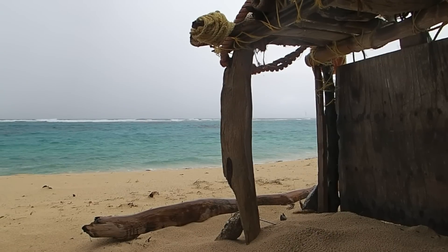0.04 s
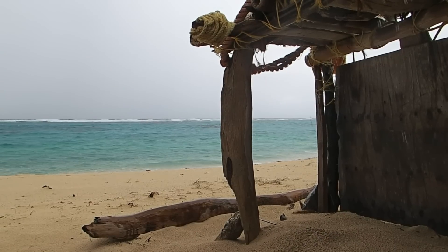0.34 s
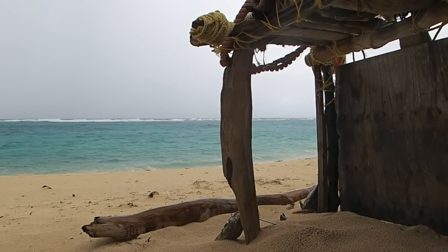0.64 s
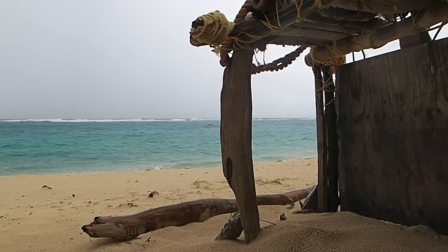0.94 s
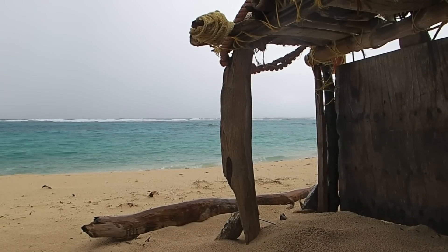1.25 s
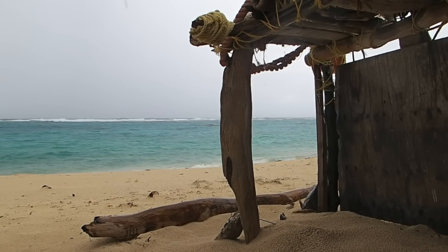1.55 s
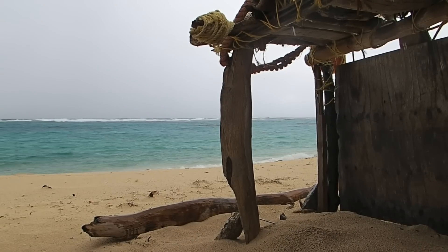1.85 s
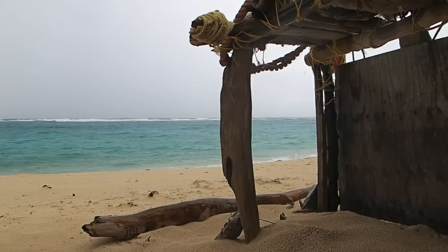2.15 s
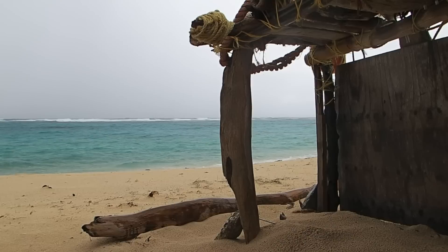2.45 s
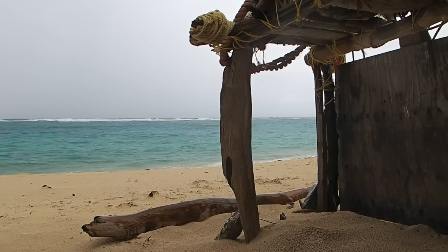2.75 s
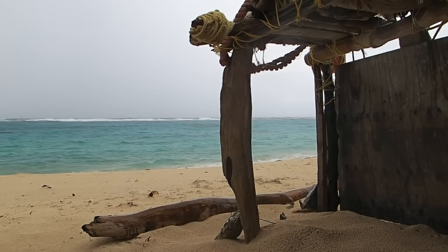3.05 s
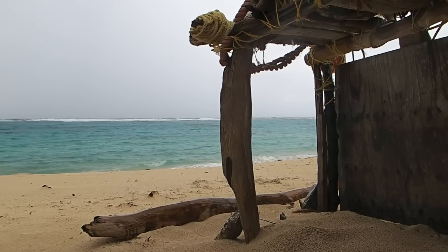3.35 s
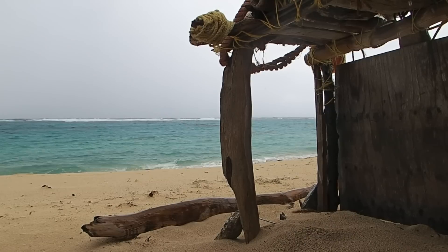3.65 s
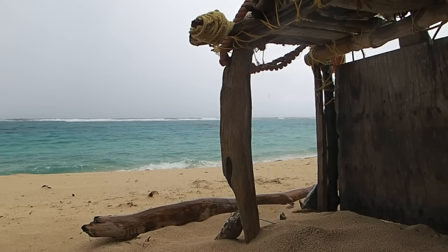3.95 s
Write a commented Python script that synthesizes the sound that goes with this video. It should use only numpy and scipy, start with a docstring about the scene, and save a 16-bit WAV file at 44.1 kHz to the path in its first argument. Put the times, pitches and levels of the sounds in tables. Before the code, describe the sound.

Rain falls evenly on a beach, heard from under a wooden shelter: a bright hiss, low patter on the roof and scattered close drips. Far waves wash behind it, and wind softly thumps the microphone midway.

```python
"""Rain on a beach, from under a shelter

Countless drops hiss on the sand and drum dully on the wooden roof; a few splash close by.
Surf washes on a far reef and light wind bumps the microphone. The microphone sits in a waterproof
case, whose resonance near 5 kHz gives the steady rain its thin sizzle."""
import sys
import numpy as np
from scipy import signal
from scipy.fft import rfft, irfft
from scipy.io import wavfile
from scipy.ndimage import uniform_filter1d

SR = 44100
rng = np.random.default_rng(int(sys.argv[2]) if len(sys.argv) > 2 else 0)


def generate_wav(sig):
    """Save sig (samples, or channels by samples) to the path in sys.argv[1] as 16-bit PCM at SR."""
    pcm = np.round(np.clip(np.atleast_2d(sig).T, -1, 1) * 32767).astype(np.int16)
    wavfile.write(sys.argv[1], SR, pcm)


N = 176400


def undb(db):
    """Decibels to amplitude ratio."""
    return 10 ** (np.asarray(db) / 20)


def unit(x):
    """Normalisation to rms 1."""
    return x / np.sqrt(np.mean(x ** 2))


def over_bins(table, size=N):
    """Interpolation of (Hz, value) rows over a spectrum, in log frequency."""
    hz, value = np.array(table, float).T
    return np.interp(np.log(np.fft.rfftfreq(size, 1 / SR) + 1e-9), np.log(hz), value)


def over_time(table):
    """Linear interpolation of (seconds, value) rows at every sample."""
    return np.interp(np.arange(N) / SR, *np.array(table, float).T)


def colour(x, table):
    """Minimum-phase filtering by (Hz, dB) rows: folding the cepstrum makes the response causal."""
    size = x.shape[-1]
    cepstrum = irfft(np.log(undb(over_bins(table, size))), size)
    cepstrum[1:size // 2] *= 2
    cepstrum[size // 2 + 1:] = 0
    return irfft(rfft(x) * np.exp(rfft(cepstrum)), size)


def wander(per_s):
    """Slow random modulation: smoothed steps with rms 1."""
    hold = max(int(SR / per_s), 2)
    steps = np.repeat(rng.standard_normal(N // hold + 1), hold)
    return unit(uniform_filter1d(uniform_filter1d(steps, hold), hold)[:N])


def noise():
    """Two uncorrelated white noises."""
    return rng.standard_normal((2, N))


def patter(per_s, spread_db):
    """Shot noise: impacts at random moments, many small and a few large, split over two signals."""
    falls = rng.random(N) < per_s / SR
    strength = undb(spread_db * np.minimum(rng.exponential(size=N), 5))
    angle = rng.uniform(0, 2 * np.pi, N)
    return unit(falls * strength * np.array([np.cos(angle), np.sin(angle)]))


def add(out, sound, start):
    """Superposition of a sound on the mix, at a start in seconds."""
    at = int(start * SR)
    out[:, at:at + sound.shape[1]] += sound[:, :N - at]


def surf():
    """Distant breakers sum incoherently to broadband noise that swells slowly and churns a little."""
    # Each row: frequency in Hz, relative spectral density in dB.
    spectrum = [(25, -62), (60, -18), (150, -8.5), (300, 1), (480, -5), (560, -0.5), (780, -1), (950, -4.5),
                (1180, -3), (1420, -7), (1630, -2.5), (1900, -7), (2200, -6.5), (2800, -10.5),
                (3700, -11.5), (6000, -23), (12000, -36.5)]
    # Each row: time in seconds, relative level in dB.
    swell = [(0, -42), (.4, -41.2), (1.2, -43.5), (1.8, -41), (2.3, -42), (3.35, -43), (3.7, -40),
             (4, -39.7)]
    wash = unit(colour(noise(), spectrum))
    return wash * undb(over_time(swell) + 1 + 0.37 * wander(per_s=9.1))


def wind():
    """Turbulent pressure at the microphone: an uneven rumble, partly coherent between the channels."""
    # Each row: centre in seconds, half length in seconds, level in dB.
    buffets = [(.02, 0.019, -51), (0.212, 0.032, -45.5), (0.306, 0.028, -46), (2.292, 0.058, -46)]
    # Each row: frequency in Hz, relative spectral density in dB.
    spectrum = [(20, -54), (35, -35), (50, -17), (70, -6.5), (95, -4.5), (125, 1.5), (170, -1), (260, -0.5),
                (600, -45), (2000, -89)]
    correlation, steady_db, gust_db = 0.49, -56, 1.5
    t = np.arange(N) / SR
    bumps = sum(undb(db) * np.exp(-((t - at) / length) ** 2) for at, length, db in buffets)
    air = np.sqrt(correlation) * rng.standard_normal(N) + np.sqrt(1 - correlation) * noise()
    push = undb(steady_db + gust_db * wander(per_s=7.88)) + bumps
    return colour(air * push, spectrum) / np.std(colour(air, spectrum))


def eddies():
    """An eddy passing one side of the microphone makes a pressure pulse: one soft push and pull."""
    # Each row: centre in seconds, pitch in Hz, level in dB, pan from -1 (left) to 1 (right).
    thumps = [(1.9933, 165, -24, .95), (2.2978, 195, -19.5, -1), (2.4734, 330, -25.5, 1)]
    half_length_cycles = .75
    t, out = np.arange(N) / SR, 0
    for at, hz, db, pan in thumps:
        cycles = (t - at) * hz
        thump = -np.sin(2 * np.pi * cycles) * np.exp(-(cycles / half_length_cycles) ** 2)
        out = out + undb(db) * thump * np.array([[1 - pan], [1 + pan]]) / 2
    return out


def roof():
    """Random impacts excite the low modes of the wooden roof and keep it drumming."""
    # Each row: frequency in Hz, bandwidth in Hz, relative level in dB.
    modes = [(163.5, 41, -0.5), (251, 41, -2), (309.7, 13.5, 0), (372, 72, 1.5), (549, 20, -11.5),
             (815, 21, -19)]
    # Each row: time in seconds, level in dB.
    level = [(0, -43.3), (.35, -42.5), (1.2, -43), (2.2, -42.5), (2.36, -40), (2.85, -43), (3.2, -41),
             (3.65, -43.7), (3.92, -41)]
    hits, out = patter(per_s=700, spread_db=1.4), 0
    for hz, width, db in modes:
        shifted_hits = np.roll(hits, rng.integers(N), axis=1)  # decorrelates the modes
        ring = signal.lfilter(*signal.iirpeak(hz, hz / width, fs=SR), shifted_hits)
        out = out + undb(db) * unit(ring)
    body = signal.butter(2, [130, 800], "bandpass", fs=SR, output="sos")
    return unit(signal.sosfilt(body, out)) * undb(over_time(level))


def rain():
    """Single drops on the sand make shot noise; those farther off merge into a Gaussian hiss."""
    # Each row: frequency in Hz, relative spectral density in dB.
    spectrum = [(40, -53), (300, -24), (1000, -4.5), (2500, -0.5), (5000, 0), (7000, -3), (9000, -5),
                (12000, -5), (16000, -6)]
    # Each row: time in seconds, relative level in dB.
    level = [(0, -41.5), (.45, -42.8), (.9, -42), (1.1, -44), (2.1, -43), (2.45, -43.5), (3.5, -43),
             (3.9, -42)]
    far_db, flutter_db = 4.5, 0.42
    drops = patter(per_s=2500, spread_db=1.7) + undb(far_db) * noise()
    hiss = unit(colour(drops, spectrum))
    return hiss * undb(over_time(level) - 3 + flutter_db * wander(per_s=34.73))


def splash(gain_db, bright_hz, spray_db, size=2048):
    """A drop's impact is an impulse and a tick of noise; a spray of droplets follows and dies away."""
    # Each row: frequency in Hz, relative spectral density in dB.
    spectrum = [(50, -75), (500, -32), (2500, -10), (5000, -1.5), (6500, 2.5), (9000, -1), (12500, -2.5),
                (16000, -11)]
    tick_s, spray_delay_s, spray_decay_s = 0.00033, 0.001, 0.0076
    focus_db = 9.5  # attenuation one octave from bright_hz
    t, chance = np.arange(size) / SR, rng.standard_normal((3, size))
    impact = undb(9) * (t == 0) * np.array([[1], [-.35]])  # negative side signal leans right
    tick = np.exp(-t / tick_s) / 2
    grain = unit(undb(3 * np.repeat(chance[2, :size // 32], 32)))
    spray_fade = (t > spray_delay_s) * np.exp(-(t - spray_delay_s) / spray_decay_s)
    spray = undb(spray_db - 9) * grain * spray_fade
    tone = [(hz, db - focus_db * np.log2(max(hz, 3000) / bright_hz) ** 2) for hz, db in spectrum]
    return undb(gain_db) * colour(impact + chance[:2] * (tick + spray), tone)


def drips():
    """Small drops land around the shelter at random, each a faint, bright transient."""
    per_s, mean_db, scatter_db = 34, -32.5, 3
    low_hz, high_hz = 8500, 15500
    out = np.zeros((2, N))
    for when, strength, bright in rng.random((int(per_s * N / SR), 3)):
        db = mean_db + scatter_db * (2 * strength - 1)
        bright_hz = low_hz + bright * (high_hz - low_hz)
        add(out, splash(db, bright_hz, spray_db=-1.5), when * N / SR)
    return out


def splashes():
    """Large drops beside the microphone stand out of the hiss as separate transients."""
    # Each row: start in seconds, relative level in dB, emphasised frequency in Hz, extra spray in dB.
    near_drops = [(.154, -25, 11500, -7), (.5113, -19, 4480, -6), (.5773, -26, 11500, -2),
                  (.957, -30.5, 8000, 4), (1.2250, -30, 8000, 3), (1.259, -20.5, 3900, -0.5),
                  (1.7435, -22, 6100, .5), (2.028, -26.5, 5500, 2), (2.037, -16, 10500, -5),
                  (2.265, -24, 4100, 1.5), (2.5815, -24.5, 6300, 2), (2.745, -32, 7000, 3.5),
                  (3.131, -21, 8300, -4), (3.280, -25.5, 6000, 1), (3.288, -22, 5000, 1.5),
                  (3.383, -26.5, 12500, -2), (3.448, -22.5, 12000, -3), (3.509, -28, 7000, -2),
                  (3.640, -21, 5800, 0)]
    out = np.zeros((2, N))
    for start, db, bright_hz, spray_db in near_drops:
        add(out, splash(db - 2, bright_hz, spray_db), start)
    return out


def ping():
    """Free vibration: one drop strikes the case, and two close, damped modes beat briefly."""
    # Each row: frequency in Hz, decay time in seconds, level in dB.
    modes = [(4930, .0055, -38.5), (5290, .003, -41.5)]
    strike_s = .5113
    t = np.maximum(np.arange(N) / SR - strike_s, 0)
    return sum(undb(db) * np.exp(-t / decay) * np.sin(2 * np.pi * hz * t) for hz, decay, db in modes)


def scene():
    """Mid-side mixing makes rain and surf diffuse in the treble; ping, wind and eddies add to them."""
    # Each row: frequency in Hz, correlation between the channels.
    coherence = [(60, 1), (150, 1), (300, 0.98), (500, 0.97), (800, .998), (3500, .996), (4900, 0.97),
                 (6200, 0.89), (7200, .8), (8200, .58), (9500, 0.32), (11500, .13), (15000, .03)]
    mid, side = rfft(surf() + rain() + roof() + splashes() + drips())
    alike = np.clip(over_bins(coherence), 0, .999)
    mid, side = mid * np.sqrt((1 + alike) / 2), side * np.sqrt((1 - alike) / 2)
    return irfft(np.array([mid + side, mid - side]), N) + ping() + wind() + eddies()


def record(dry):
    """The resonant case colours the sound and favours the right channel; a low-pass cuts the top."""
    # Each row: frequency in Hz, gain of the case in dB.
    case_response = [(3000, 0), (3650, 0.5), (3850, -4), (4020, -6.5), (4250, 0), (4550, 8.5), (4880, 13),
                     (5150, 10), (5500, 5.5), (6000, 1), (6180, 2.5), (6290, 3), (6450, -1), (7200, -3),
                     (10000, -0.5), (11000, 1), (12300, 5), (13200, 1.5), (14300, -2.5), (15700, -7)]
    # Each row: frequency in Hz, excess of right over left in dB.
    balance = [(100, 4.5), (3500, 4.5), (4800, 7.5), (5800, 4), (7500, 2), (10000, 0.8), (12300, 4),
               (15000, 3)]
    cutoff_hz = 15750
    lean = undb(np.array([[-.5], [.5]]) * over_bins(balance))
    heard = colour(irfft(rfft(dry) * lean, N), case_response)
    return signal.sosfilt(signal.ellip(12, .1, 90, cutoff_hz, fs=SR, output="sos"), heard)


dry = scene()
out = record(dry)
generate_wav(out)
```